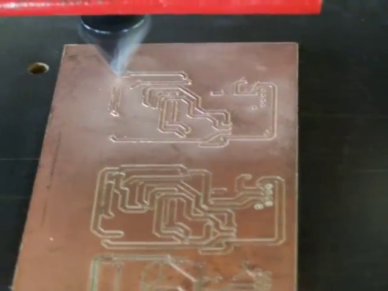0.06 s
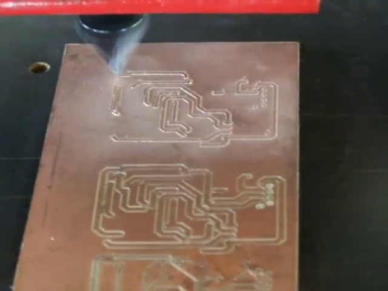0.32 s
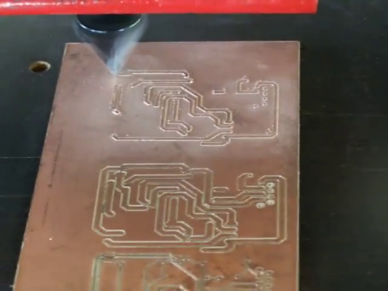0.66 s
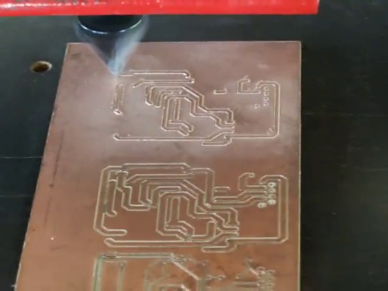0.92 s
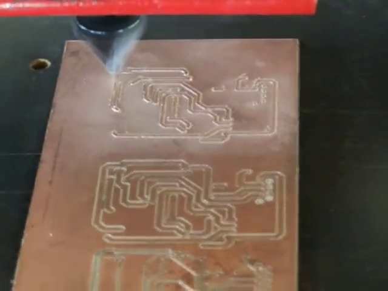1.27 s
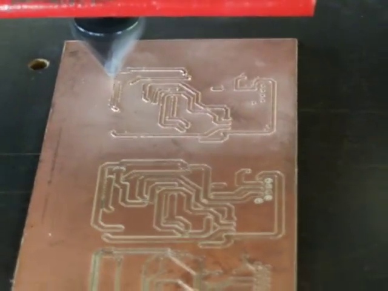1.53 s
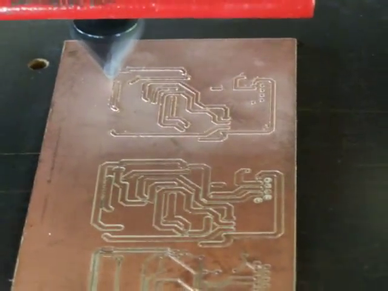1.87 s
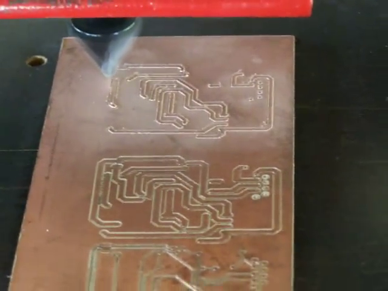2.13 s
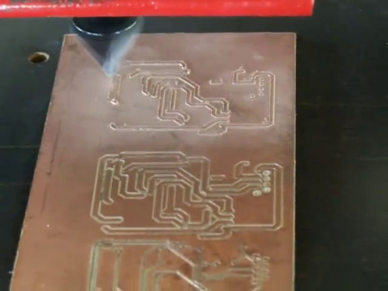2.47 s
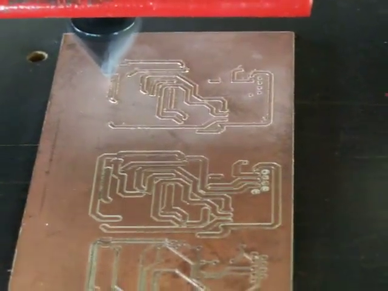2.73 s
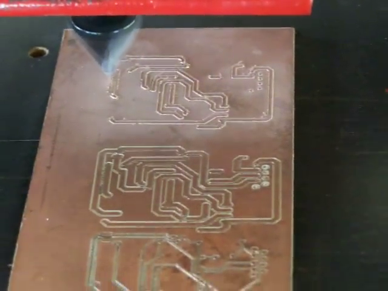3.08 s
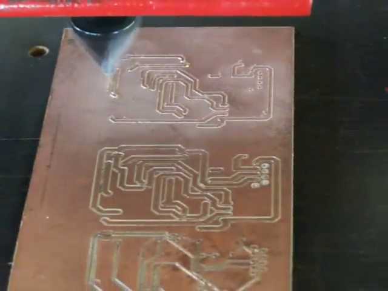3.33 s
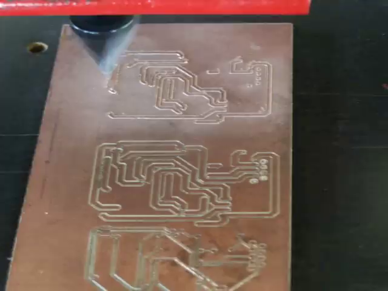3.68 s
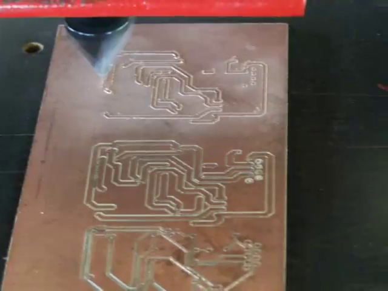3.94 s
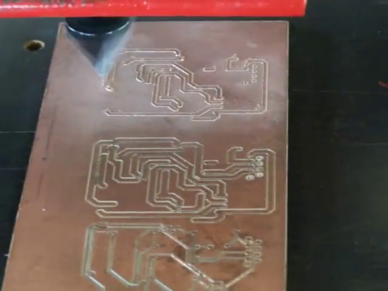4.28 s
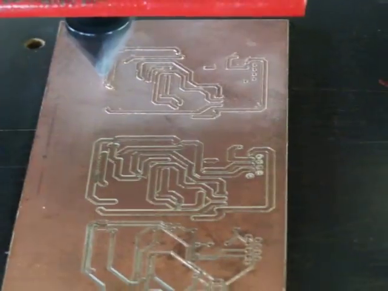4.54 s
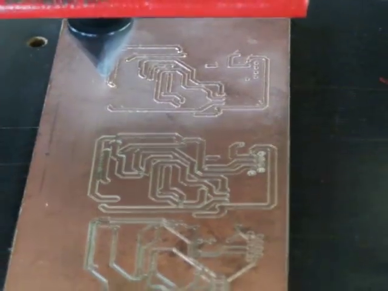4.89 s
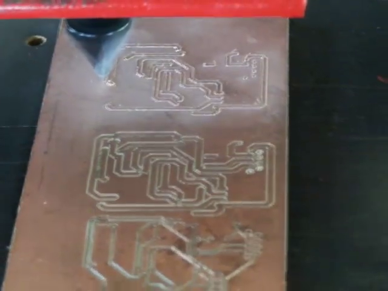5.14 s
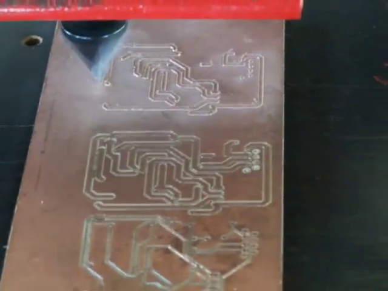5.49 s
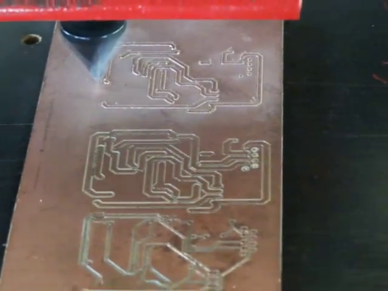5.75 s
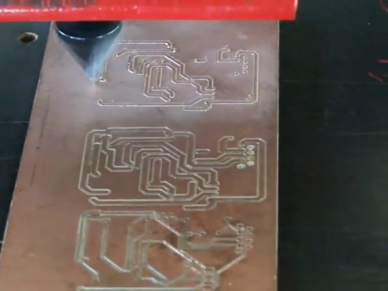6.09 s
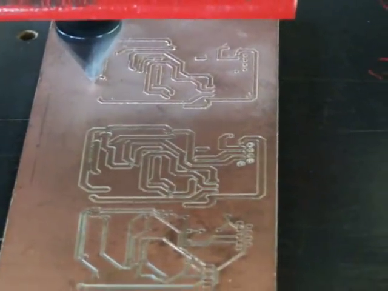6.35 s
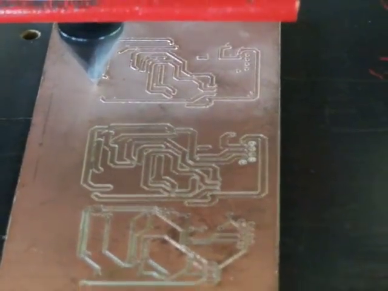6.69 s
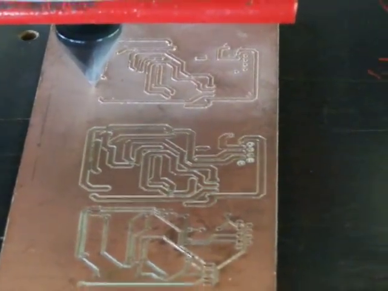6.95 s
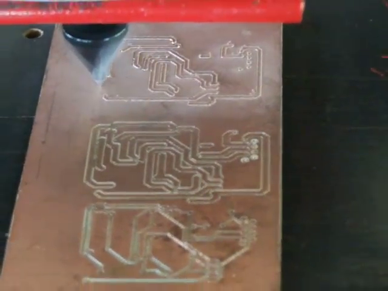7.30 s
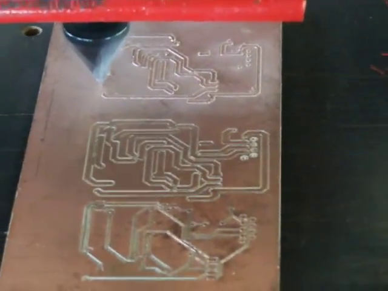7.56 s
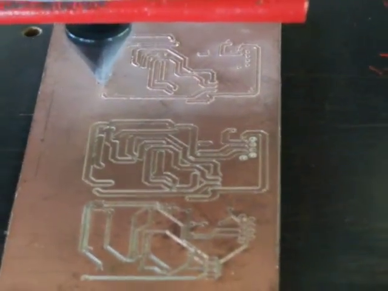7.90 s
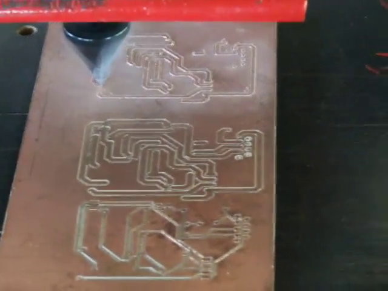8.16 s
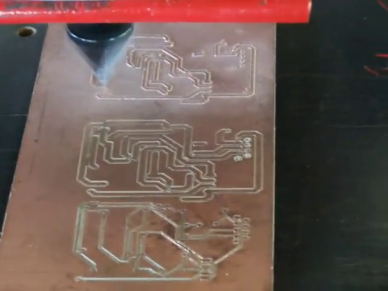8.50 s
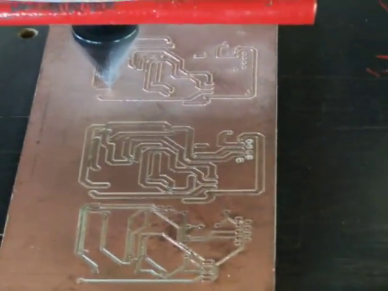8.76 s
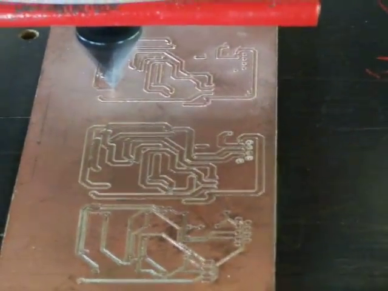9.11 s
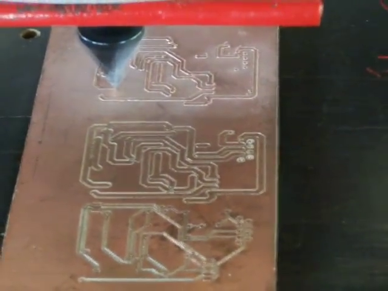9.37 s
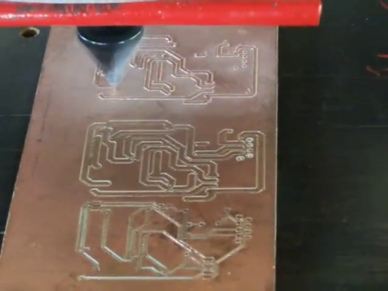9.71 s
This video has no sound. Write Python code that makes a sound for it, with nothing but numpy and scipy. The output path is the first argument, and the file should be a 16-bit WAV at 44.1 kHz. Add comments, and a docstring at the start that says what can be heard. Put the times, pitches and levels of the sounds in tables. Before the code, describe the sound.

Close, constant hiss and high-pitched whine from a small milling spindle carving a copper circuit board.

```python
"""A small CNC router engraves a circuit board, close up, its spindle at about 16000 rpm.
From the start, air and cutter rasp hiss through the machine's resonances; the shaft whines, mostly
on even orders, with ball-bearing tones between. At 0.3 s the cutter sinks into the copper and the
hum grows. From 0.5 s the carriage knocks softly and the axis motors chirp faintly now and then.
At 6.55 s the cut turns a corner: the spindle speeds up slightly, whines louder, then settles."""
import sys
import numpy as np
from scipy import signal
from scipy.fft import rfft, irfft
from scipy.io import wavfile

SR = 44100
rng = np.random.default_rng(int(sys.argv[2]) if len(sys.argv) > 2 else 0)


def to_wav(sig):
    """Store sig (one row per channel, or 1-D mono) as 16-bit WAV at the path in sys.argv[1].

    Samples outside -1..1 are clipped; the rate is SR.
    """
    pcm = np.clip(np.atleast_2d(sig), -1, 1) * 32767
    pcm = np.round(pcm).astype(np.int16)
    wavfile.write(sys.argv[1], SR, pcm.T)  # frames by channels


N = 429085
TIME_S = np.arange(N) / SR


def undb(db):
    """Decibels to gain."""
    return 10 ** (np.asarray(db) / 20)


def unit(x):
    """Scale to rms 1."""
    return x / np.sqrt(np.mean(x ** 2))


def ramp(start_s, length_s):
    """Linear rise from 0 to 1."""
    return np.clip((TIME_S - start_s) / length_s, 0, 1)


def walk(rate_hz):
    """Smooth random wander, rms 1."""
    hz = np.fft.rfftfreq(N, 1 / SR)
    return unit(irfft(rfft(rng.standard_normal(N)) / (1 + (hz / rate_hz) ** 4), N))


def tone(turns, flutter_db, flutter_hz):
    """Partial of rms about 1 with a fluttering level."""
    sine = np.sqrt(2) * np.sin(2 * np.pi * (turns + rng.random()))
    return sine * undb(flutter_db * walk(flutter_hz))


def hiss(turns, swell_db, level_db=-15.5, rasp_db=-10, chip_spread_db=3, edge_depth=0.22):
    """Rushing air plus tiny chips that break off in step with the cutting edge."""
    air = rng.standard_normal(N)
    chips = rng.standard_normal(N) * undb(chip_spread_db * rng.standard_normal(N))
    edge = 1 + edge_depth * np.cos(2 * np.pi * 2 * turns)
    rasp = unit(chips * edge) * undb(0.91 * walk(rate_hz=9))
    coloured = machine_body(air + undb(rasp_db) * rasp)
    return coloured * undb(level_db + swell_db + 0.09 * walk(rate_hz=10))


def machine_body(excitation):
    """Colour noise with the air spectrum and the machine's resonances; rms 1."""
    # rushing-air spectrum: f/Hz, level/dB
    air_spectrum = [(20, -41.5), (70, -30.5), (250, -27), (520, -24), (620, -15.0), (1050, -14.5),
                    (2000, -12.5), (3200, -8), (4400, -2.5), (5600, 0.0), (7400, -5), (8200, -14),
                    (8650, -24.5), (8950, -39.5)]
    # resonances and hollows of housing and bed: f/Hz, width/Hz, gain/dB
    resonances = [(815, 39, 3.7), (1178, 153, 7.7), (1307, 51, 6.8), (1409, 115, 7.8), (1487, 40, 4.8),
                  (1557, 100, 3.9), (1674, 29, -2.9), (2338, 220, 3.3), (2823, 300, 3.8), (3320, 38, 1.3),
                  (3552, 140, 3.9), (3803, 86, 3.4), (4300, 80, 3.5), (4721, 128, -2.3), (4897, 157, 3.3),
                  (5092, 24, -2.9), (5198, 111, 2.3), (5932, 90, 2.4), (6592, 104, -3.6), (7131, 124, 2.7),
                  (7451, 117, 2.9), (8430, 71, -3.1)]
    hz = np.fft.rfftfreq(N, 1 / SR)
    air_hz, air_db = np.transpose(air_spectrum)
    db = np.interp(np.log(hz + 1), np.log(air_hz), air_db)
    for centre_hz, width_hz, gain_db in resonances:
        db += gain_db * np.exp(-(2 * (hz - centre_hz) / width_hz) ** 2)
    return unit(irfft(rfft(excitation) * undb(db), N))


def shaft(turns, hum_db, whine_db):
    """The cutter hums twice a turn as it bites; the rotor whines on other shaft orders."""
    # shaft-locked tones: order, level/dB re whine_db
    orders = [(1, -27), (3, -24.5), (4, -3), (6, -0.5), (7, -17), (8, -11.5), (10, -9), (16, -4.5),
              (18, -7.5), (20, -11.5), (21, -6.5), (22, -9), (24, 2.5)]
    hum = undb(hum_db) * tone(2 * turns, flutter_db=.5, flutter_hz=5)
    whine = sum(undb(db) * tone(order * turns, flutter_db=1.3, flutter_hz=2.5) for order, db in orders)
    return hum + undb(whine_db) * whine


def bearing(turns, squeal_db, passes_per_turn=7.179):
    """Balls pass a spot on the turning race: tones with sidebands at multiples of the shaft rate."""
    # bearing tones: ball-pass harmonic, sideband/shaft orders (rounded in use), relative level/dB
    partials = [(1, -2, -49.5), (1, -1, -55), (1, 0, -33), (1, 2, -46), (1, 4, -54.5), (2, -1.5, -48.5),
                (2, 0.5, -45), (2, 2, -47), (2, 0.5, -42), (3, 1.5, -49)]
    passes = passes_per_turn * turns
    whine = np.zeros(N)
    for harmonic, sideband, db in partials:
        partial_turns = harmonic * passes + round(sideband) * turns
        whine += undb(db) * tone(partial_turns, flutter_db=-0.05, flutter_hz=3.7)
    # one sideband falls on a resonance and squeals unsteadily
    squeal = tone(2 * passes + 4 * turns, flutter_db=3.5, flutter_hz=4.6)
    return whine + undb(squeal_db - 2.5) * squeal


def axis_motors():
    """Steppers sing at their step rate, gliding as an axis speeds up or brakes."""
    # axis moves: t/s, length/s, start f/Hz, end f/Hz, level/dB
    moves = [(.55, .3, 402, 399, -59), (0.919, .05, 410, 540, -40), (2.2, 2.6, 71, 71, -69),
             (6.901, 0.058, 540, 410, -45), (7.0, .055, 235, 195, -52), (7.12, 0.68, 397, 399, -55),
             (9.538, 0.054, 410, 540, -43)]
    out = np.zeros(N)
    for start_s, length_s, from_hz, to_hz, db in moves:
        progress = ramp(start_s, length_s)
        steps = np.cumsum(from_hz + (to_hz - from_hz) * progress) / SR
        envelope = np.sqrt(np.abs(np.sin(np.pi * progress)))
        out += undb(db) * envelope * tone(steps, flutter_db=1.5, flutter_hz=12)
    return out


def carriage_knocks(band_hz=(60, 500), decay_s=.011):
    """The carriage takes up its slack with short, dull thuds."""
    # carriage knocks: t/s, level/dB
    knocks = [(.505, -44), (7.40, -44), (7.503, -39), (7.58, -39)]
    bandpass = signal.butter(2, band_hz, "bandpass", fs=SR, output="sos")
    rumble = unit(signal.sosfilt(bandpass, rng.standard_normal(N)))
    envelope = np.zeros(N)
    for start_s, db in knocks:
        age_s = TIME_S - start_s
        envelope += undb(db) * (age_s >= 0) * np.exp(-np.abs(age_s) / decay_s)
    return rumble * envelope


def scene(shaft_hz=267.52, surge_hz=1.03, corner_s=6.55, rise_s=0.646, settle_s=3.6, hiss_db_per_s=0.05):
    """One shaft drives tones and rasp; the cutter's bite and the corner's speed surge set the levels."""
    # layer gains: idle/dB, added by full bite/dB, added at surge peak/dB
    hum_gains = (-53, 10, 1.2)
    whine_gains = (-36.5, -2, 2.5)
    bearing_gains = (0.83, -.5, -0.6)
    squeal_gains = (-29, -2.5, -1.2)
    swell_gains = (0.05, -0.34, 0.1)
    bite = ramp(start_s=.3, length_s=.72)
    settling = np.exp(-np.maximum(TIME_S - corner_s - rise_s, 0) / settle_s)
    surge = ramp(corner_s, rise_s) * settling
    turns = np.cumsum(shaft_hz + surge_hz * surge) / SR

    def gain_db(gains):
        idle_db, bite_db, surge_db = gains
        return idle_db + bite_db * bite + surge_db * surge

    mix = shaft(turns, gain_db(hum_gains), gain_db(whine_gains))
    mix += undb(gain_db(bearing_gains)) * bearing(turns, gain_db(squeal_gains))
    mix += hiss(turns, gain_db(swell_gains) + hiss_db_per_s * TIME_S)
    return (mix + axis_motors() + carriage_knocks())[None]


def record(dry, ceiling=.52, cutoff_hz=8950):
    """Mono microphone: rounds the loudest peaks, cuts steeply above the hiss."""
    rounded = dry / (1 + (dry / ceiling) ** 8) ** (1 / 8)
    lowpass = signal.ellip(12, .1, 90, cutoff_hz, fs=SR, output="sos")
    return signal.sosfilt(lowpass, rounded)


dry = scene()
out = record(dry)
to_wav(out)
```